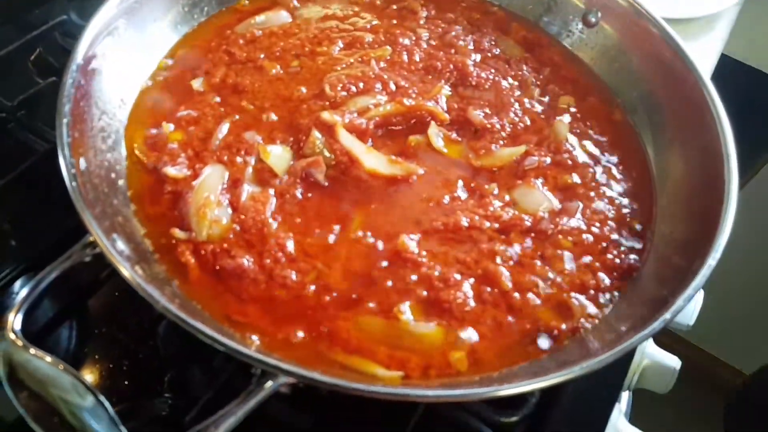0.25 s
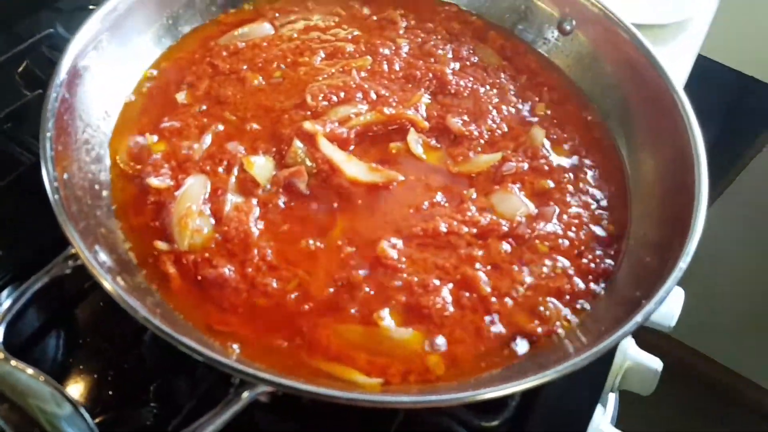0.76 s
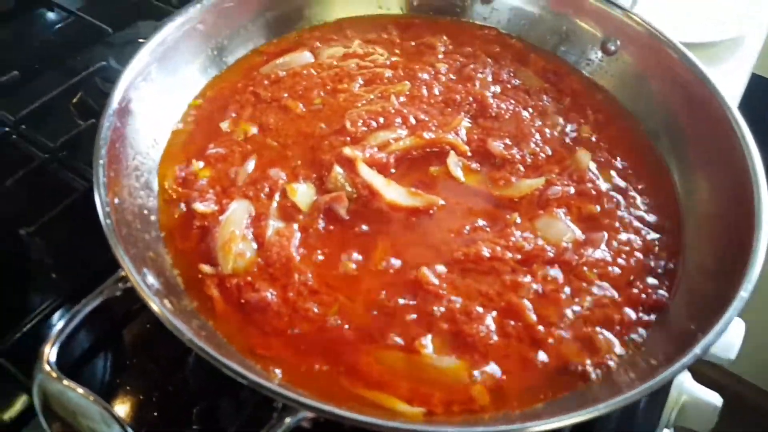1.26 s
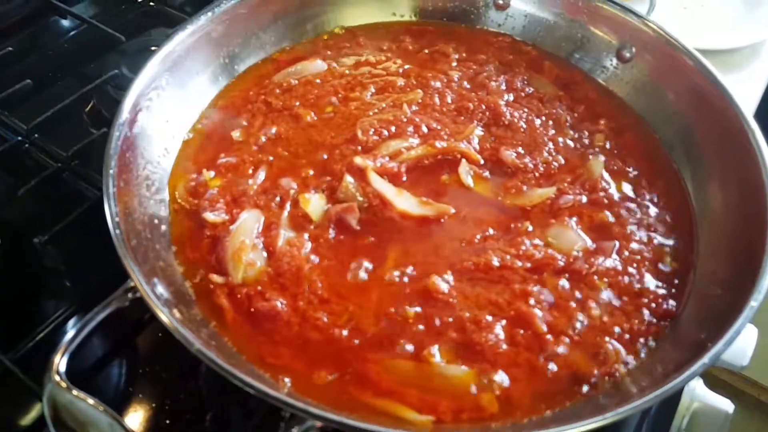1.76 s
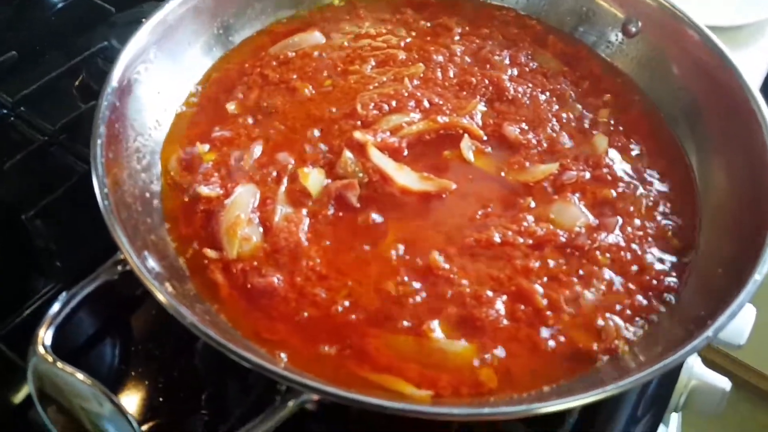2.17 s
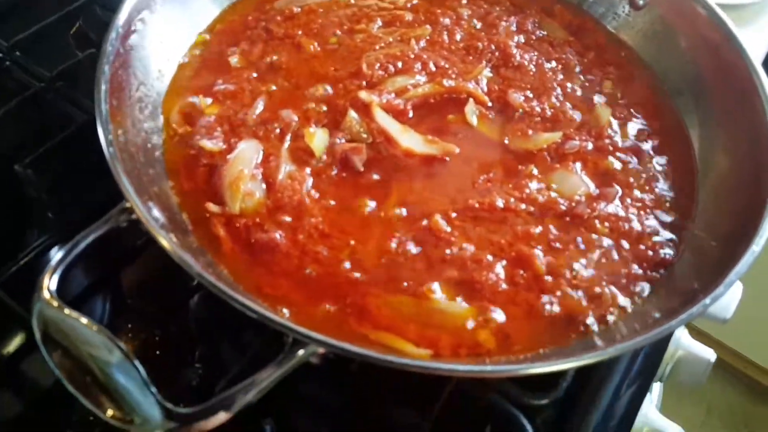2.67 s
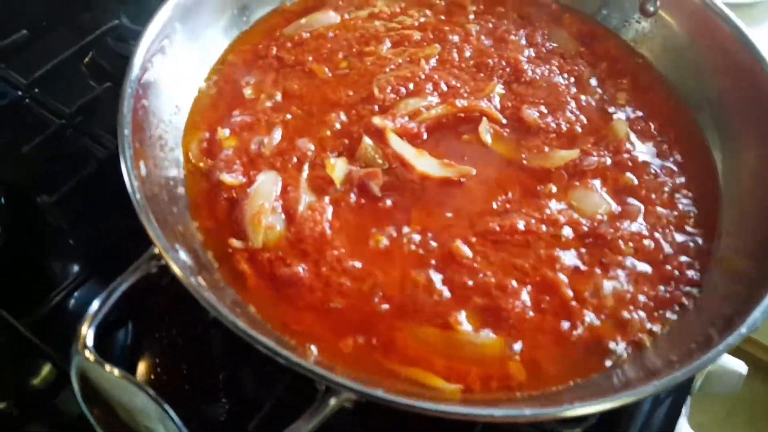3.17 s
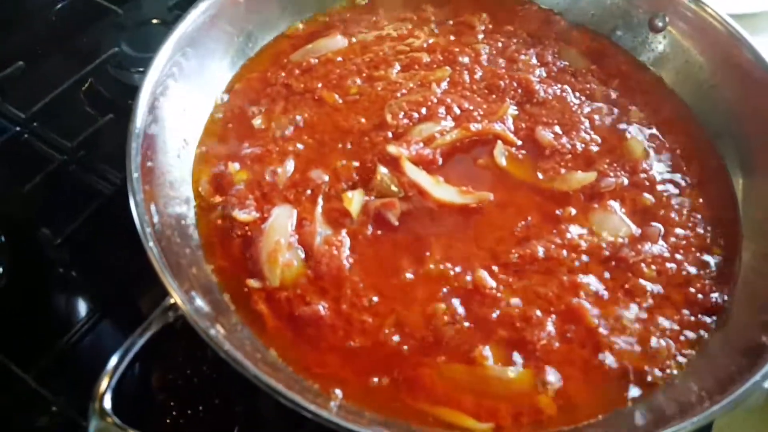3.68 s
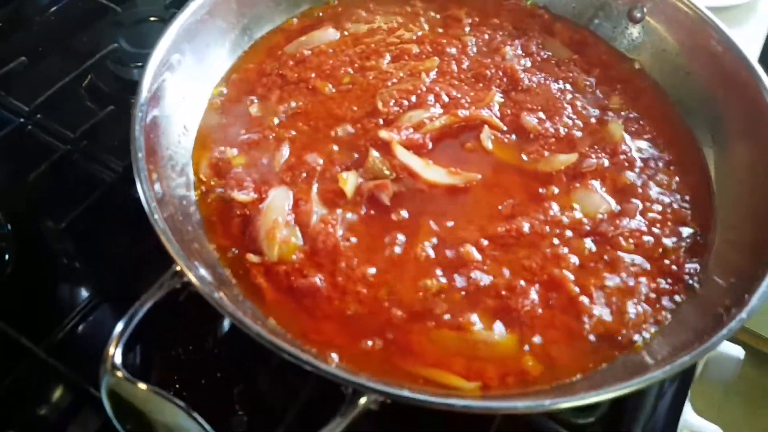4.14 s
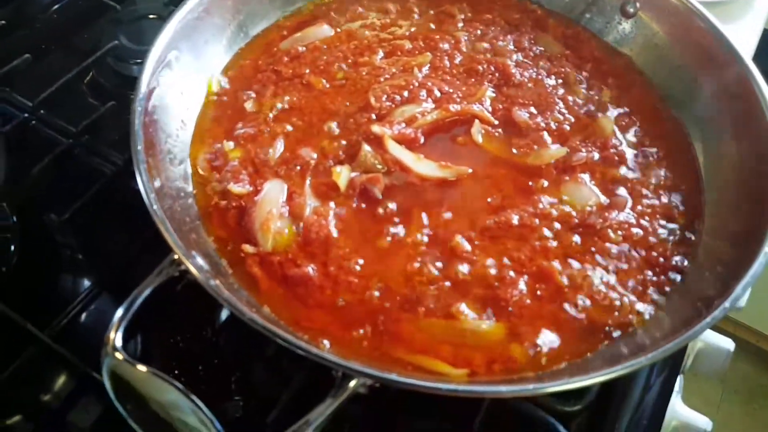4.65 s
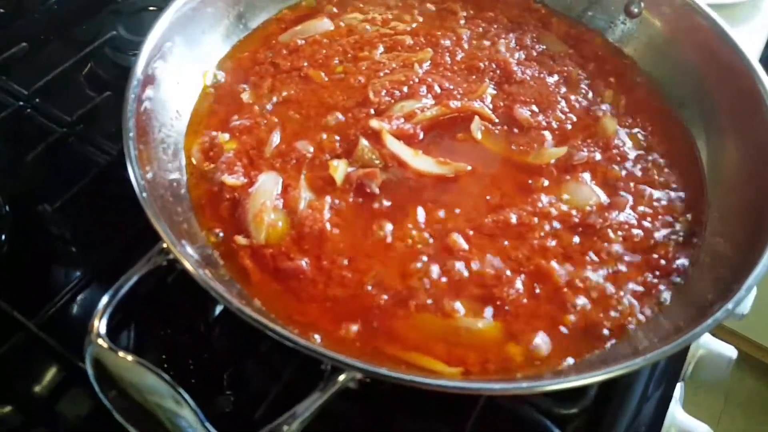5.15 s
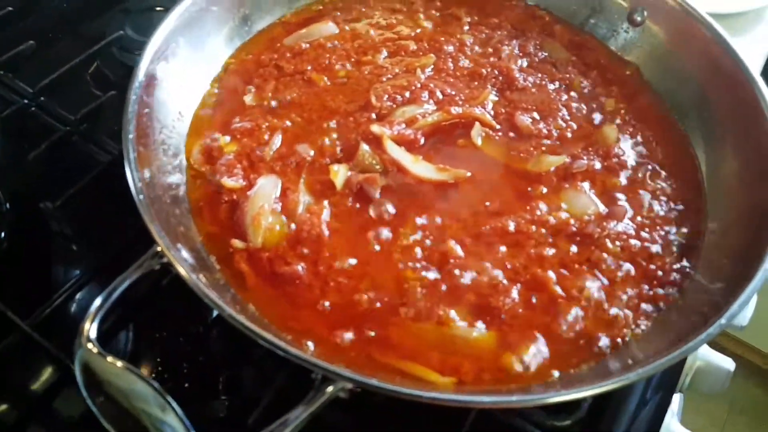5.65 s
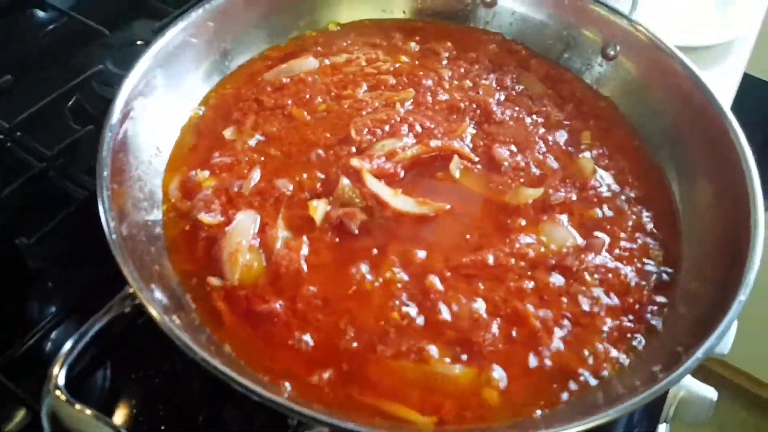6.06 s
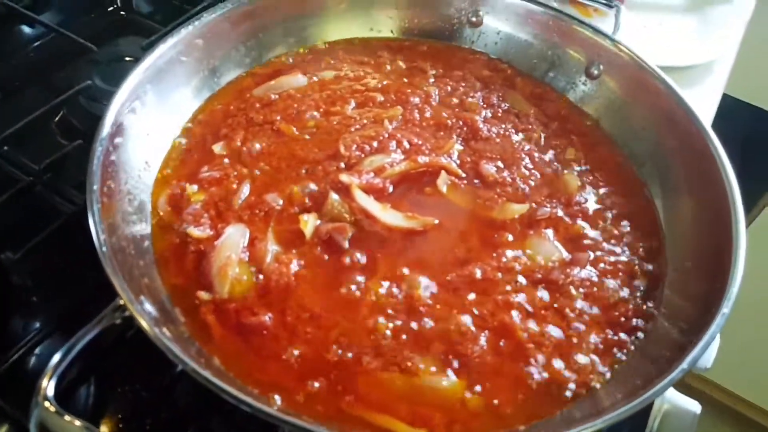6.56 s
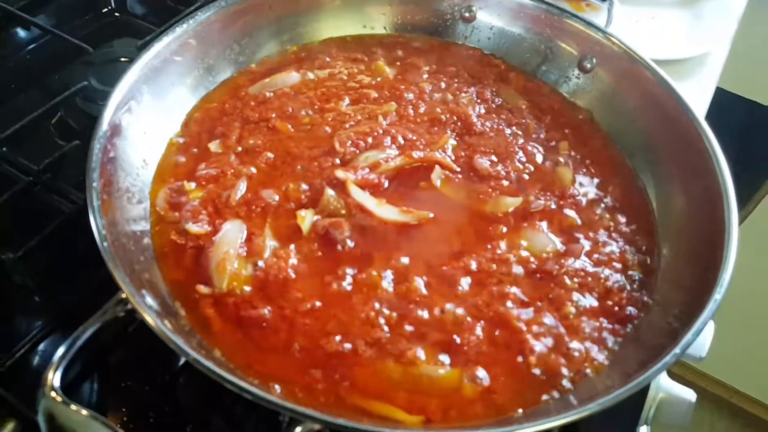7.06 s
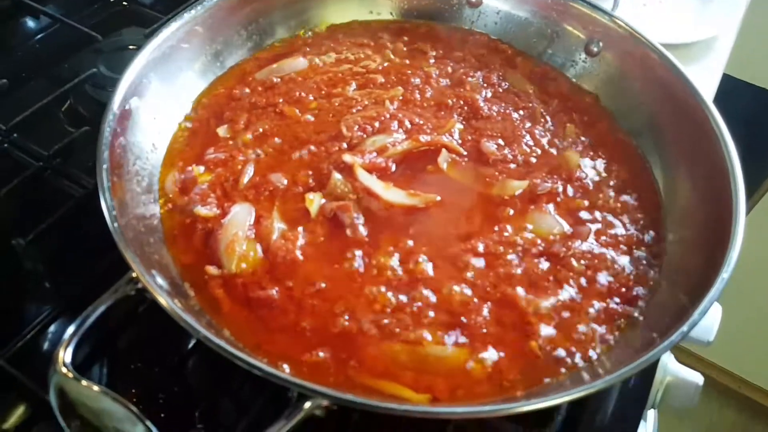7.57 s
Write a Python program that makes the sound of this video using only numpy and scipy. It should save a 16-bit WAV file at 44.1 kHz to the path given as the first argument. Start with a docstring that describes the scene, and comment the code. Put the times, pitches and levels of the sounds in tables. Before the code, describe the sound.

Steady crackling simmer of a thick sauce, popping bubbles and sharp droplet clicks, while a hand on the microphone rumbles and thumps at left.

```python
"""Thick tomato stew simmers in a steel pan, a fine sizzle of tiny ringing bubbles from beginning to end.
Cookware knocks at once, and again from 2.6 s to 3.9 s, as dull body resonances with a brief ring of steel.
Bubbles burst as decaying puffs of filtered noise and droplets spit as bright clicks, in a small kitchen.
A hand covers the left microphone port: that side is muffled, rumbles, and thumps from 0.7 s on; skin slides
over it at 2.2 s and 6.6 s. The hardest thumps, from 3.4 s on, make the gain control turn both sides down."""
import sys
import numpy as np
from scipy import signal
from scipy.fft import rfft, irfft, next_fast_len
from scipy.io import wavfile
from scipy.ndimage import uniform_filter1d, minimum_filter1d, map_coordinates

SR = 44100
rng = np.random.default_rng(int(sys.argv[2]) if len(sys.argv) > 2 else 0)


def put_to_file(sound):
    """Save the sound as 16-bit audio at rate SR, in the file named by the first command-line argument."""
    columns = np.atleast_2d(sound).T  # one column per channel
    safe = np.clip(columns, -1, 1)
    whole_steps = np.round(safe * 32767)
    wavfile.write(sys.argv[1], SR, whole_steps.astype(np.int16))


N = 344862
TIME = np.arange(N) / SR  # s
AGE = TIME[:SR // 3]  # s since the onset of a single event

# strength of the simmer: (t/s, relative level/dB)
SIMMER_LEVEL = [(0, -40.5), (1.5, -41.5), (3.3, -42), (4.2, -47), (6.2, -46), (7, -42.5), (7.8, -45.5)]
# pushes of the finger on the port: (t/s, level/dB, rise/s)
FINGER_THUMPS = [(.691, -17.5, 0.0023), (.912, -9, 0.015), (3.119, -10, 0.011), (3.445, 1, 0.0013),
                 (3.6892, -3.5, 0.0069), (3.7984, 13, 0.028), (3.971, -3.5, 0.011), (4.237, -7, 0.0055),
                 (4.3231, -7.5, 0.00044), (5.688, -14, 0.015), (6.3314, -10, 0.0035), (6.867, -14, .0022),
                 (6.898, -4, 0.015), (7.2219, 3.5, 0.00027), (7.296, -5.5, .0046)]


def sizzle():
    """Superposition: countless tiny bubbles merge to a hiss; the nearest stand out as crackle and blips."""
    # spectral envelope of the hiss: (f/Hz, relative level/dB)
    envelope = [(25, -14), (70, 4), (200, -1), (420, 4), (950, -4.5), (1550, 0), (3000, -15.5),
                (4000, -3.5), (5200, -9), (7100, -14), (10000, -12), (13500, -11), (14600, -12.5),
                (15500, -30)]
    # resonance peaks upon it: (f/Hz, width/Hz, boost/dB)
    peaks = [(5910, 540, 7.5), (8210, 490, 8.5), (12330, 190, 7.5), (12600, 180, 4), (13100, 180, 5)]

    def colour(hz):
        """Lorentzian resonances raise a smooth spectral envelope."""
        boost_db = sum(db / (1 + (2 * (hz - centre) / width) ** 2) for centre, width, db in peaks)
        return amp(along(envelope, hz) + boost_db)

    surge = amp(0.65 * wobble(14))
    hiss = patchy(noise(colour), depth_db=2.0) * surge
    crackle = tiny_bubbles(count=5000, centre_hz=7090, spread=0.56, cycles=1.4, scatter_db=6.5)
    blips = tiny_bubbles(count=1100, centre_hz=2580, spread=0.63, cycles=5.9, scatter_db=5.5)
    near = amp(-12.0) * crackle * amp(2.25 * wobble(16)) + amp(-16.5) * blips
    return amp(curve(SIMMER_LEVEL)) * (amp(-1.5) * hiss + near + amp(-4.5) * room(near))


def patchy(x, depth_db):
    """Time-frequency modulation: clusters of like-sized bubbles swell and fade as small patches of pitch."""
    spectrum = signal.stft(x, nperseg=1024)[2]
    field = rng.standard_normal(spectrum.shape)
    field = uniform_filter1d(field, size=6, axis=0)  # across frequency
    field = uniform_filter1d(field, size=5, axis=1)  # across time
    modulated = signal.istft(spectrum * amp(depth_db * unit(field)), nperseg=1024)[1]
    return unit(modulated[:N])


def tiny_bubbles(count, centre_hz, spread, cycles, scatter_db):
    """Damped oscillators: bubbles at random moments ring for a few cycles, each at its own pitch; rms 1."""
    t = AGE[:SR // 200]
    start = rng.integers(0, N, (count, 1))
    hz = np.clip(centre_hz * np.exp(spread * rng.standard_normal((count, 1))), None, SR / 2.5)
    size = amp(scatter_db * np.minimum(rng.exponential(size=(count, 1)), 4))
    rings = size * np.sin(2 * np.pi * hz * t) * np.exp(-hz * t / cycles)
    positions = start + np.arange(len(t))
    return unit(np.bincount(positions.ravel(), rings.ravel(), N)[:N])


def bursts():
    """Cavity resonance: steam puffs through a torn, flapping skin; a narrower resonance rings more."""
    # the big bursting bubbles: (t/s, relative level/dB, centre f/Hz, width/octaves, t60/s)
    big_bubbles = [(.168, -38, 1890, .6, 0.11), (1.257, -35, 8260, 0.22, 0.076),
                   (1.323, -34.5, 2230, 0.55, 0.31), (1.385, -38, 2040, 0.7, 0.38),
                   (2.431, -34.5, 3500, 1.5, 0.043), (2.763, -30.5, 6900, .44, 0.17),
                   (2.867, -29, 3700, 1.2, .047), (2.957, -37.5, 3570, 0.48, 0.061),
                   (3.02, -30, 6000, 5.1, 0.042), (3.63, -42.5, 3400, .5, .27),
                   (3.899, -37, 1790, 0.34, .13), (5.242, -34.5, 7060, 1.6, 0.3),
                   (5.283, -36, 1050, 1.6, 0.17), (5.787, -32, 4460, 2, .17),
                   (5.79, -35.5, 4900, 0.059, .13), (6.737, -27, 5180, 0.18, 0.052),
                   (6.9445, -28.5, 3500, .3, .045), (6.9447, -31.5, 5300, .33, 0.039)]
    out = np.zeros(N)
    for s, db, centre_hz, width, t60 in big_bubbles + small_bursts():
        puff = noise(lambda hz: 1 / (1 + (np.log2((hz + 1) / centre_hz) / width) ** 2), size=len(AGE))
        ring = noise(lambda hz: 1 / (1 + ((hz / centre_hz - 1) / 0.065) ** 2), size=len(AGE))
        ring = ring * np.exp(-width / 0.41)
        onset = 1 - np.exp(-AGE / (0.01 * t60))
        add(out, s, amp(db - 1.0) * unit(puff + ring) * fade(t60) * onset)
    flutter = amp(1.8 * wobble(400))
    return out * flutter


def small_bursts():
    """Poisson process: small bubbles come at random, as strong as the simmer; rows as for the big ones."""
    luck = rng.standard_normal((80, 2))
    rows = []
    for s, (loud, high) in zip(chance_times(per_s=3), luck):
        simmer_db = np.interp(s, *np.transpose(SIMMER_LEVEL))
        level_db = simmer_db + 2 + 2 * loud  # a little over the simmer, and scattered
        centre_hz = 6470 * 2 ** (0.45 * high)  # spread in octaves around one pitch
        rows.append((s, level_db, centre_hz, 0.28, 0.11))
    return rows


def spits():
    """Impulsive source: a droplet snaps with one very short, bright click and a little spray."""
    # spitting droplets: (t/s, relative level/dB)
    droplets = [(0.667, -28), (1.473, -29), (1.5304, -45), (1.7105, -37), (3.019, -35), (5.0295, -29),
                (5.094, -33), (5.7788, -25.5), (6.094, -29), (6.2866, -38.5), (6.9019, -23)]
    out = np.zeros(N)
    for s, db in droplets:
        snap_hz = 10500 * np.exp(0.17 * rng.standard_normal())
        snap = np.sin(2 * np.pi * snap_hz * AGE) * fade(0.0008)
        spray = noise(lambda hz: hz / (hz + 6000), size=len(AGE)) * fade(0.1)
        add(out, s, amp(db + 11) * (snap + amp(-23.5) * spray))
    return out


def knocks():
    """Modal vibration: cookware bumps with a dull clatter in broad resonances and a brief ring of steel."""
    # cookware knocks: (t/s, dull body relative level/dB, steel ring relative level/dB, clatter t60/s)
    bumps = [(.072, -36.5, -55, 0.23), (0.1096, -32.5, -27.5, .2), (.264, -41, -35, .15),
             (.289, -40, -34.5, 0.26), (2.6325, -22.5, -49, .18), (2.764, -28.5, -53, 0.25),
             (3.546, -43, -45, 0.17), (3.9, -38.5, -48, 0.32)]
    # broad body resonances: (f/Hz, width/Hz, relative level/dB)
    body_modes = [(216, 230, -2), (396, 99, 1.5), (567, 120, -5), (844, 147, -5), (1390, 380, -12.5),
                  (1720, 220, -10), (1980, 360, -18)]
    # steel modes: (f/Hz, mean relative level/dB, t60/s)
    steel_modes = [(678, -11.5, 0.22), (1200, -0.5, 0.047), (1294, 2.5, 0.025), (2200, -11, 0.23),
                   (3410, -19, 0.11)]

    def body(f):
        """Second-order resonances summed with alternating sign."""
        return sum((-1) ** k * amp(db) * 1j * f * width / (centre ** 2 - f ** 2 + 1j * f * width)
                   for k, (centre, width, db) in enumerate(body_modes))

    out = np.zeros(N)
    for s, body_db, ring_db, t60 in bumps:
        clatter = noise(body, size=len(AGE)) * fade(t60) * (1 - np.exp(-AGE / 0.0044))
        ring = np.zeros(len(AGE))
        for hz, db, life in steel_modes:
            strength = amp(db + rng.normal(0, 1.5))  # each knock excites the modes differently
            ring += strength * np.sin(2 * np.pi * hz * AGE) * fade(life)
        add(out, s, amp(body_db + 1.5) * clatter + amp(ring_db) * ring)
    return out


def hand():
    """Contact noise: the grip trembles, more so around each bump, and twice skin slides across the port."""
    # rumble of the resting hand: (t/s, relative level/dB)
    grip = [(0, -32.5), (.7, -28.5), (1.2, -29.5), (2.3, -26), (4.6, -32), (7.8, -31)]
    # rumble spectrum: (f/Hz, relative level/dB)
    rumble_spectrum = [(15, -23), (30, -7.5), (48, 3), (75, -2.5), (110, -10.5), (170, -24.5), (250, -31.5),
                       (500, -41.5), (1000, -54), (3000, -82)]
    # sliding skin spectrum: (f/Hz, relative level/dB)
    skin_spectrum = [(60, 2), (170, 3), (400, -10.5), (800, -21.5), (2500, -27), (4500, -49), (8000, -70)]
    # slides of the finger: (start t/s, length/s, relative level/dB)
    slides = [(2.23, 0.63, -33), (6.589, 0.07, -37)]
    unrest_s = 0.079  # the hand is restless for a moment around each bump
    unrest = np.max([np.exp(-((TIME - s) / unrest_s) ** 2) for s, *_ in FINGER_THUMPS], axis=0)
    rumble_db = curve(grip) + 5.5 * unrest + 2.4 * wobble(14)
    rumble = amp(rumble_db) * noise(lambda hz: amp(along(rumble_spectrum, hz)))
    sliding = sum(amp(db) * stroke(start, length) for start, length, db in slides)
    slide = sliding * amp(1.4 * wobble(90)) * noise(lambda hz: amp(along(skin_spectrum, hz)))
    return rumble + slide + thumps() + clicks()


def thumps():
    """Transient response: a push on the sealed port rings the microphone's low-cut at a sinking pitch."""
    out = np.zeros(N)
    start_hz, end_hz, sink_s = 112.7, 39.3, 0.0094
    cycles = np.cumsum(end_hz + (start_hz - end_hz) * np.exp(-AGE / sink_s)) / SR
    swing = np.cos(2 * np.pi * cycles) * np.exp(-(AGE / 0.033) ** 2)
    nudges = [(s, -24, 0.0012) for s in chance_times(per_s=3)]  # slight pushes between the bumps
    for s, db, rise in FINGER_THUMPS + nudges:
        edge = np.exp(-rise / 0.0016) * 0.13  # the quickest touches start with a hard step
        press = 1 - (1 - edge) * np.exp(-(AGE / rise) ** 2)
        add(out, s, amp(db) * swing * press)
    return out


def clicks():
    """Damped resonance: a quick touch also clicks, a few cycles of the case around the microphone."""
    # clicks of the fingertip: (t/s, relative level/dB, f/Hz)
    touches = [(3.4459, -9, 1200), (3.686, -11.5, 400), (4.3231, -19, 373), (4.998, -26, 380),
               (6.3312, -4, 376), (7.2218, -24, 410)]
    out = np.zeros(N)
    for s, db, hz in touches:
        ring = np.sin(2 * np.pi * hz * AGE) * fade(3.34 / hz)  # 3.34 cycles until it has died away
        add(out, s, amp(db + 2.0) * ring * (1 - np.exp(-AGE / 0.00029)))
    return out


def stroke(start, length):
    """Kinematics of a slide: its speed, 0-1, picks up, holds and stops."""
    ramp_s = 0.13 * length
    return np.clip(np.minimum(TIME - start, start + length - TIME) / ramp_s, 0, 1)


def room(x):
    """Diffuse reverberation of the kitchen: noise decays exponentially, the treble soonest."""
    # reverberation time: (f/Hz, t60/s)
    kitchen = [(200, 0.45), (2000, 0.54), (6000, 0.2), (15000, 0.087)]
    hz, t, spectrum = signal.stft(rng.standard_normal(SR // 2), SR, nperseg=256)
    decay = np.exp(-np.log(1000) * t / along(kitchen, hz)[:, None])
    tail = signal.istft(spectrum * decay, SR, nperseg=256)[1]
    response = np.pad(tail / np.linalg.norm(tail), (SR // 250, 0))  # 4 ms late
    return signal.fftconvolve(x, response)[:N]


def amp(db):
    """Logarithmic level: decibels to gain."""
    return 10 ** (np.asarray(db) / 20)


def unit(x):
    """Normalisation by mean power: scale to rms 1."""
    return x / np.sqrt(np.mean(x ** 2) + 1e-20)


def along(points, hz):
    """Interpolation of (f/Hz, value) points on a logarithmic frequency axis."""
    f, v = np.transpose(points)
    return np.interp(np.log(hz + 1), np.log(f + 1), v)


def curve(rows):
    """Linear interpolation of (t/s, value) rows, one value per sample."""
    return np.interp(TIME, *np.transpose(rows))


def wobble(rate):
    """Slow random modulation: a smooth curve through rate random knots a second."""
    return map_coordinates(rng.standard_normal(int(N * rate / SR) + 4), [TIME * rate])


def chance_times(per_s):
    """Poisson process: random moments, per_s a second on average."""
    gaps = rng.exponential(size=80) / per_s
    times = np.cumsum(gaps)
    return times[times < N / SR]


def filtered(x, response):
    """Linear filtering: the spectrum of x times a response of frequency."""
    n = x.shape[-1]
    m = next_fast_len(n + SR // 10)
    return irfft(rfft(x, m) * response(np.fft.rfftfreq(m, 1 / SR)), m)[..., :n]


def noise(response, size=N):
    """Spectral shaping: white noise coloured by a response, rms 1."""
    return unit(filtered(rng.standard_normal(size), response))


def add(track, s, sound):
    """Superposition: mix a sound in at time s."""
    part = track[max(round(s * SR), 0):][:len(sound)]
    part += sound[:len(part)]


def fade(t60):
    """Exponential decay by 60 dB in t60 seconds."""
    return np.exp(-np.log(1000) * AGE / t60)


def scene():
    """Transmission: the right port hears the stove openly, the left through the finger with the hand's noise."""
    # transmission through the finger: (f/Hz, gain/dB)
    finger = [(100, 5.5), (500, -10), (1500, -9.5), (3000, -12), (5800, -19), (7500, -40), (8800, -29),
              (10000, -15), (13000, -8.5), (15500, -20)]
    events = bursts() + spits() + knocks()
    open_port = sizzle() + events + amp(-9) * room(events)
    behind_finger = sizzle() + amp(-6.5) * events + amp(-7.5) * room(events)
    covered_port = filtered(behind_finger, lambda hz: amp(along(finger, hz)))
    handling = hand()
    return np.array([covered_port + handling, open_port + amp(-43) * handling])  # left, right


def gain_control(x, ceiling_db, hold, recovery_db):
    """Peak limiting: both channels drop at once; the gain waits hold s, then creeps up recovery_db a second."""
    needed = np.minimum(ceiling_db - 20 * np.log10(np.abs(x).max(axis=0) + 1e-9), 0)
    half = int(hold * SR / 2)
    held = minimum_filter1d(needed, 2 * half + 1, origin=half, mode="constant")  # looks back only
    gain_db = np.minimum.accumulate(held - recovery_db * TIME) + recovery_db * TIME
    return x * amp(uniform_filter1d(gain_db, SR // 1000))  # smoothed over 1 ms


def record(dry):
    """Limiting in level and band: gain control on both channels, then a sharp low-pass."""
    levelled = gain_control(dry, ceiling_db=-0.4, hold=2.0, recovery_db=5.2)
    return filtered(levelled, lambda hz: hz < 15600)


dry = scene()
out = record(dry)
put_to_file(out)
```